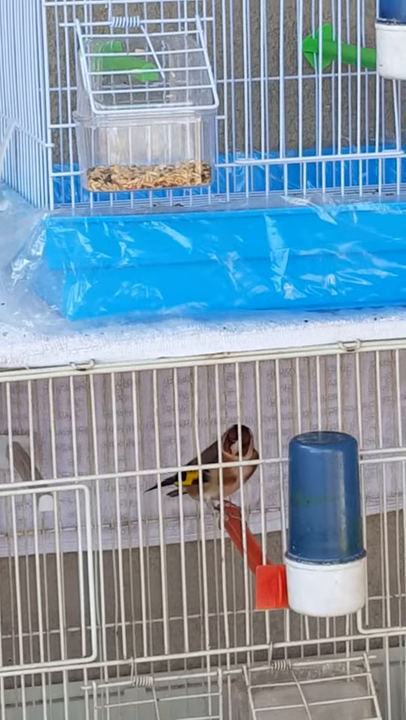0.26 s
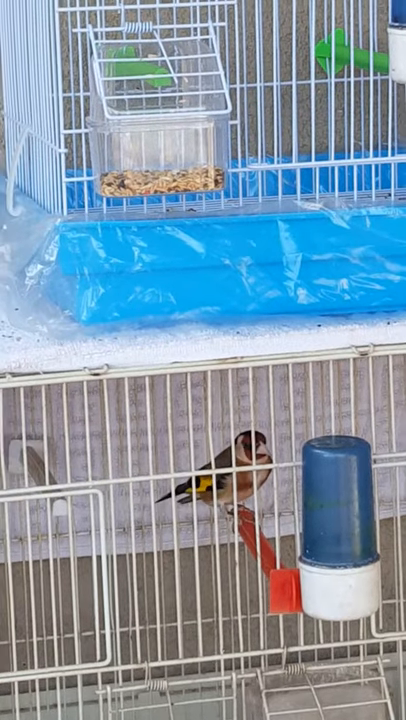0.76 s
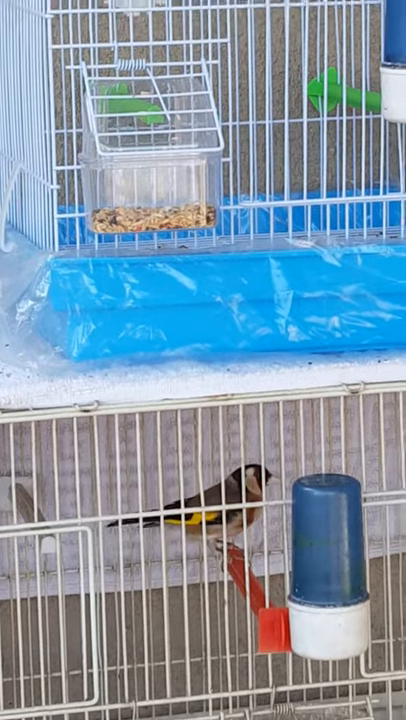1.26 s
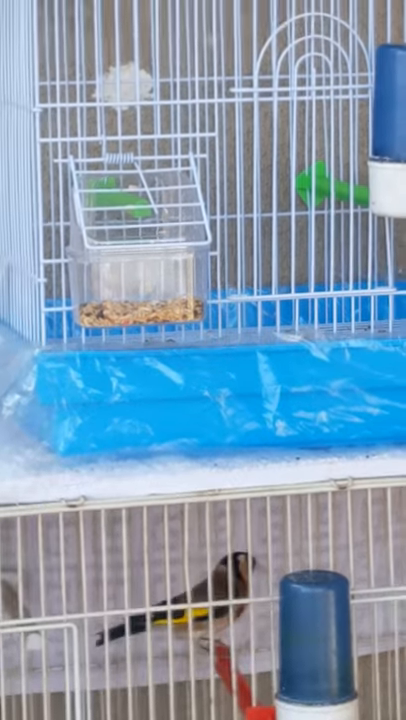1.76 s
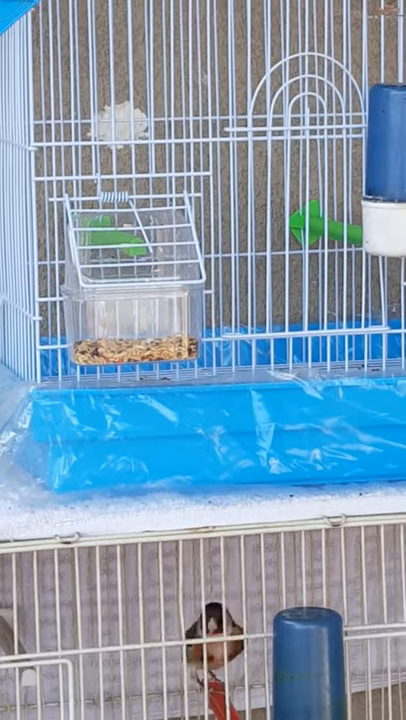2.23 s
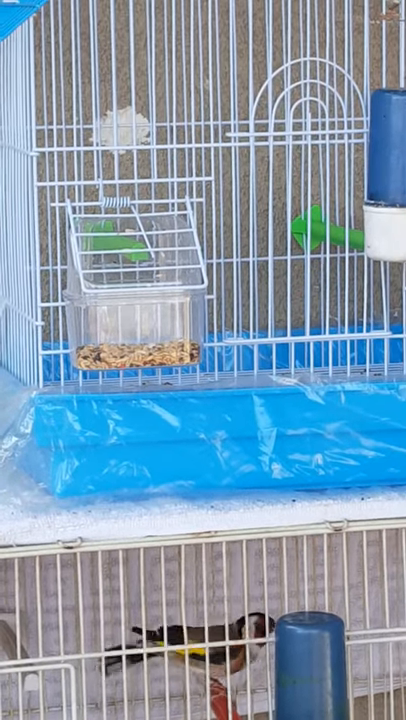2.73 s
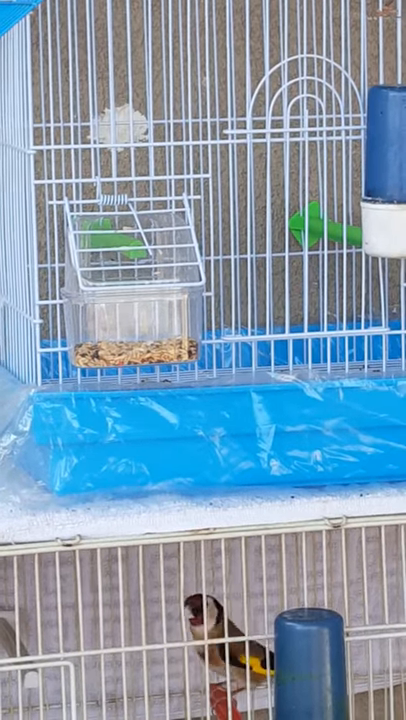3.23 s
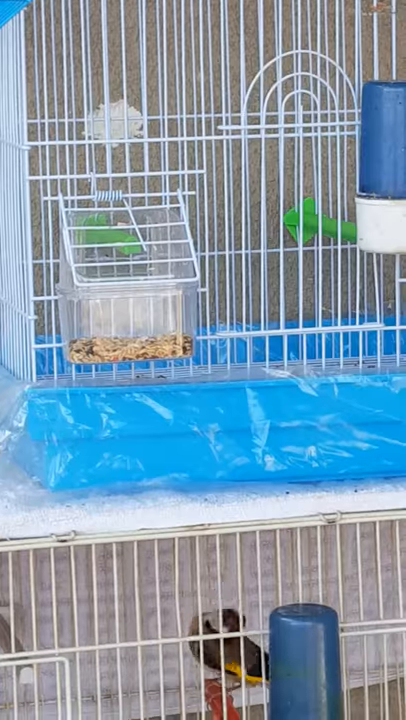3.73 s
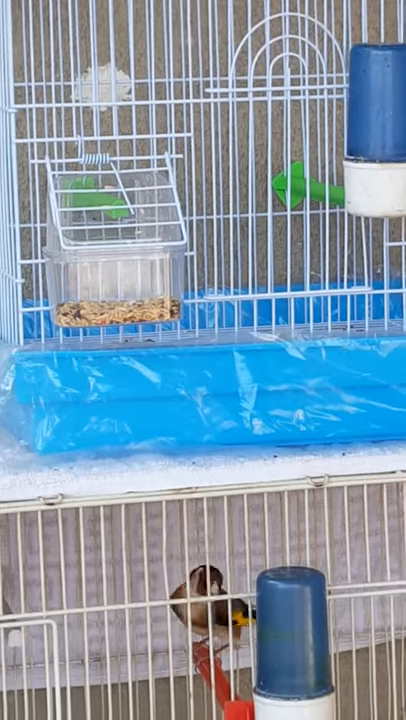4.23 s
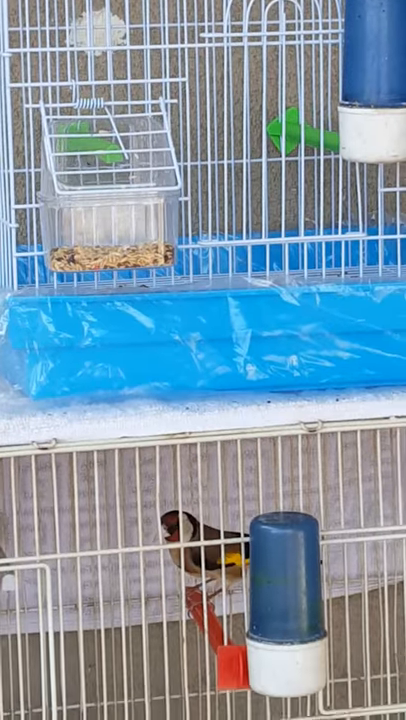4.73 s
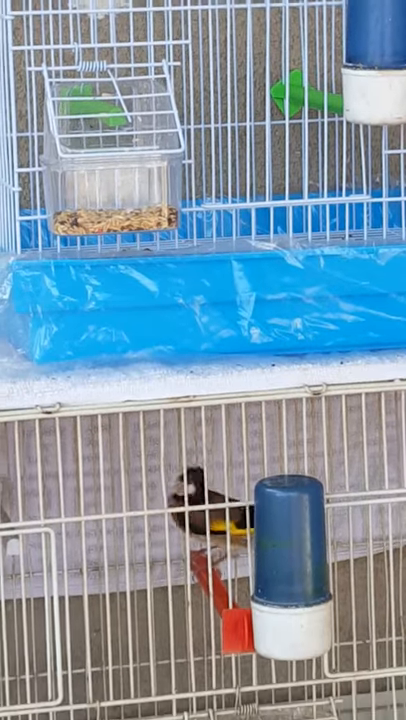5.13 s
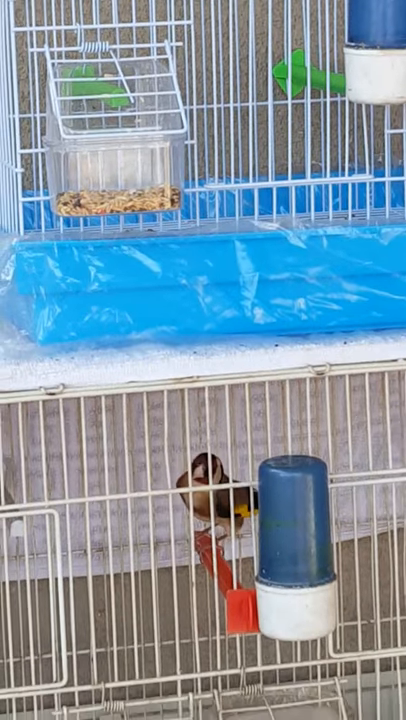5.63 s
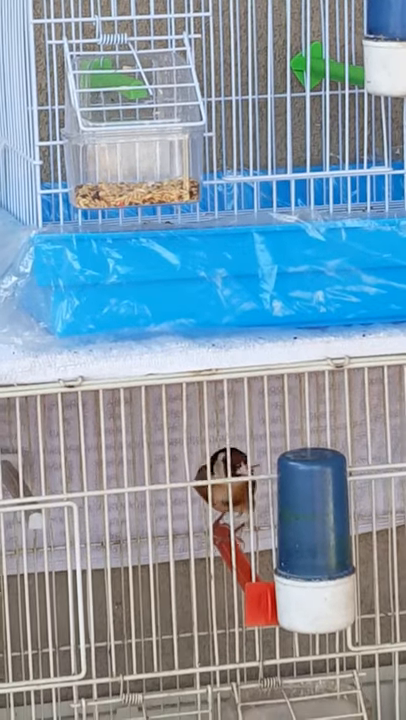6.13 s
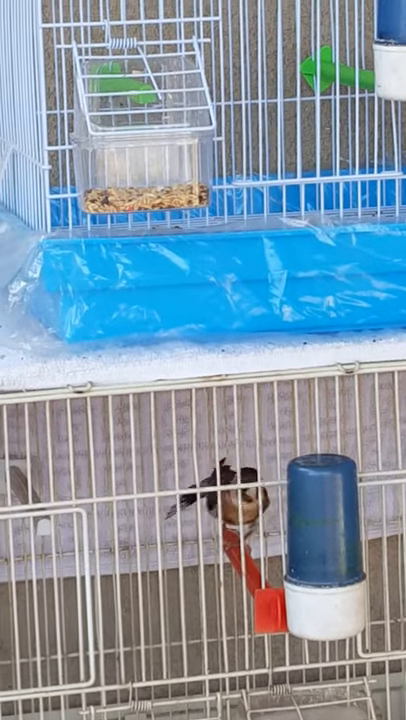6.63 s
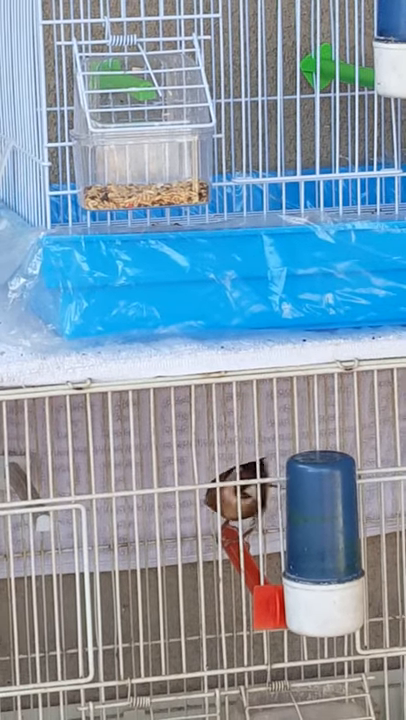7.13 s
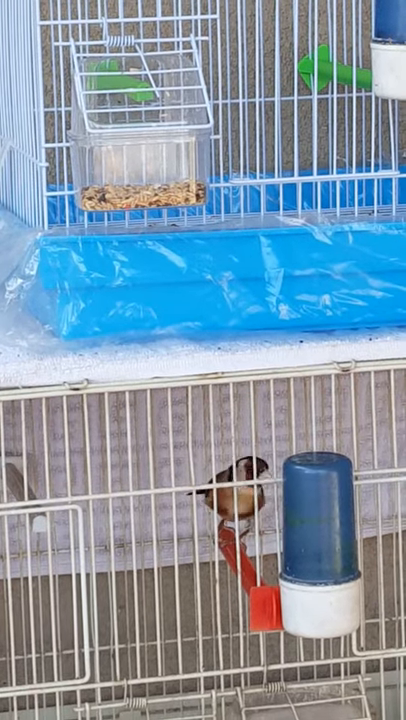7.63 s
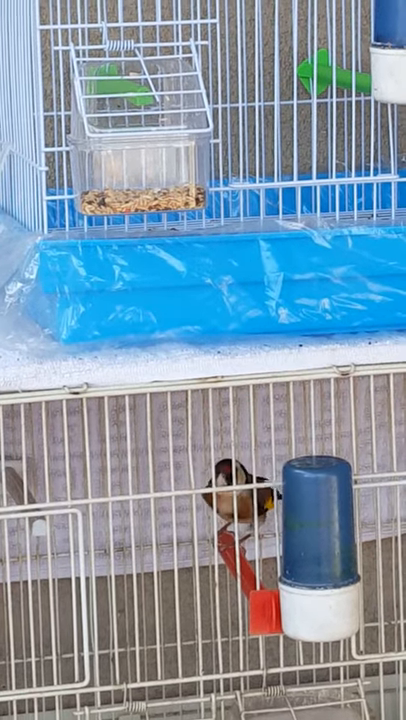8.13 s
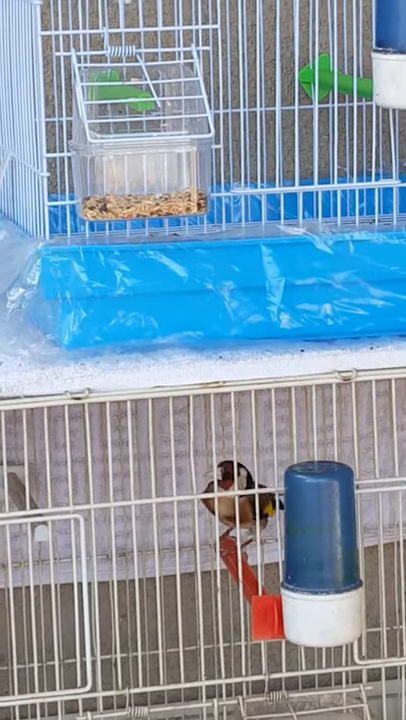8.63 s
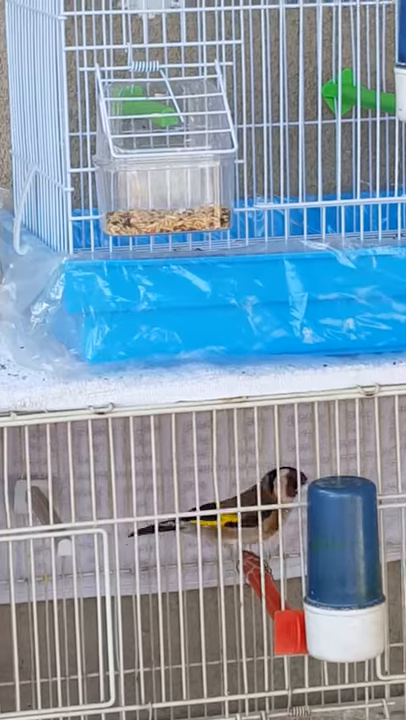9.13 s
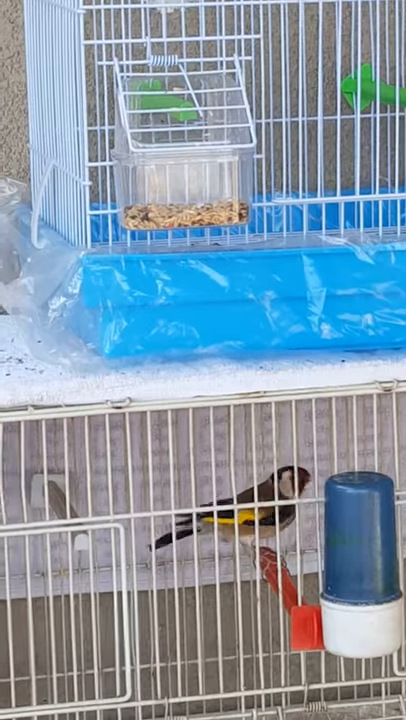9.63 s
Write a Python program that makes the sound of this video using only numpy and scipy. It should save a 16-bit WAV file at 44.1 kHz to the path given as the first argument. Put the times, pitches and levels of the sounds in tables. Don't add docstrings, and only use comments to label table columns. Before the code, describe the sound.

Bright goldfinch calls ring from hard balcony walls, short falling trills and a piercing long whistle, with light cage ticks, distant birds and dull traffic.

```python
import sys
import numpy as np
from scipy import signal
from scipy.io import wavfile
from scipy.ndimage import uniform_filter1d

SR = 44100
rng = np.random.default_rng(int(sys.argv[2]) if len(sys.argv) > 2 else 0)


def to_wav(sig):
    pcm = np.clip(np.atleast_2d(sig), -1, 1) * 32767
    pcm = np.round(pcm).astype(np.int16)
    wavfile.write(sys.argv[1], SR, pcm.T)


def elevation(decibels):
    levels = np.asarray(decibels, float)
    return 10 ** (levels / 20)


N = 435266

# [t/s, level/dB]
TRAFFIC = [(0, -0.5), (2, -2.5), (4, 0.5), (6.5, -0.3), (7.5, 2.5), (8.5, -4.5), (9.87, -1)]
# [f/Hz, level per Hz/dB]
HUM_SPECTRUM = [(25, -7.5), (50, -1.5), (79, -10.5), (105, -3.5), (310, -7.5), (450, -12.5), (1000, -11),
                (1600, -15.5), (2500, -21), (5400, -30.5), (6300, -38), (9500, -48.5), (13000, -45.5),
                (16000, -42)]
# [f/Hz, correlation/1]
HUM_LIKENESS = [(30, 0.95), (130, 0.98), (290, 0.91), (640, 0.67), (1410, 0.21), (3100, 0.1), (6820, 0.074)]
# [f/Hz, left over right/dB]
HUM_LEAN = [(60, 0.5), (110, 0.5), (200, 0), (380, 0.0), (700, 0.0), (1290, -3), (2380, -0.5), (4400, -3),
            (8120, 4), (15000, -2)]
# [f/Hz, width/Hz, early level/dB, late level/dB, flutter/dB]
MURMUR = [
    (50.1, 16, -69, -61, 1),
    (109.2, 11, -66.5, -68, 2),
    (4400, 270, -74, -84, 2.5),
    (5600, 190, -80, -87.5, 3),
]
# [t/s, length/s, first f/Hz, last f/Hz, level/dB]
FAR_LEFT = [(.34, .11, 5050, 4950, -74), (.36, .25, 4150, 4250, -70), (.725, 0.091, 2300, 2200, -59.5),
            (0.817, .06, 2400, 2300, -60), (.86, .05, 4550, 4550, -69), (1.473, 0.032, 5000, 4950, -67),
            (1.475, 0.042, 3600, 3600, -66), (1.472, .03, 2380, 2400, -59), (2.452, 0.19, 4300, 4300, -68),
            (6.455, .05, 5950, 5200, -70), (7.46, .07, 3700, 3700, -64), (7.453, .067, 4700, 4590, -62),
            (7.53, .09, 4450, 4320, -57)]
FAR_RIGHT = [(1.69, 0.034, 6100, 6050, -69), (3.82, .53, 6900, 6600, -79), (3.894, .06, 4700, 4480, -66),
             (4.19, .06, 5500, 5450, -61.5), (4.40, .12, 6400, 6350, -83), (5.01, 0.02, 5670, 5600, -62),
             (5.33, .14, 3050, 3000, -64.5), (6.54, .03, 4400, 4600, -69), (6.55, .09, 3030, 3050, -64.5),
             (6.563, 0.053, 7000, 6900, -73), (7.585, .04, 4000, 3780, -55.5), (7.45, .07, 7220, 7200, -72),
             (7.718, .035, 7200, 7200, -64), (7.953, 0.033, 6050, 6270, -56.5),
             (7.96, 0.031, 2230, 3100, -59), (7.982, .055, 4230, 3600, -42.5),
             (8.89, 0.036, 6000, 5300, -71), (9.17, 0.045, 4400, 3800, -62)]
# [t/s, peak level/dB]
TICKS = [(0.779, -62), (0.809, -62), (0.999, -69), (1.269, -64), (1.475, -55), (1.489, -65.5), (1.687, -57),
         (1.769, -63), (1.939, -68.5), (2.340, -55.5), (2.597, -62), (3.218, -51), (3.939, -62),
         (4.233, -60), (6.230, -62), (7.454, -66.5), (8.406, -62), (9.095, -60), (9.129, -53.5),
         (9.149, -60), (9.199, -62)]

# [churr t/s, grace t/s, chirrup t/s, catch t/s, whistle t/s]
PHRASES = [
    (2.679, 2.788, 2.823, 2.910, 2.980),
    (6.641, 6.756, 6.794, 6.878, 6.948),
]
# [first f/Hz, turning f/Hz, last f/Hz, turn t/s, bend as a power of time/1]
LOW_PITCH = [
    (1342, 1960, 1965, .104, 1.3),
    (2440, 2750, 2620, .025, 1.5),
    (2520, 2700, 2960, .030, 1.2),
    (1970, 2860, 2900, .017, 1.267),
    (2744, 5240, 5600, .016, .8),
    (5500, 3515, 3560, .17, 3.0),
]
HIGH_PITCH = [
    (1920, 2335, 2340, .104, 1.1),
    (3553, 3100, 3000, .025, 1.34),
    (3000, 3520, 4200, .025, 1.5),
    (2845, 3270, 3800, .017, 1.82),
    (5400, 6300, 6180, .016, 2.4),
    (6320, 5800, 5610, 0.064, 1.5),
]
# [wait/s, attack/s, hold/s, release/s, held level/dB, growth over the hold/dB]
LOW_BREATH = [
    (0.0021, .030, .060, .015, -50, -6),
    (0.0088, .008, .010, .008, -50.5, 3.5),
    (.012, .014, .032, 0.0089, -38.5, 3.5),
    (0.00096, .004, 0.015, .004, -44.5, 2),
    (0.0007, 0.0051, 0.014, 0.023, -36.5, 5),
]
HIGH_BREATH = [
    (.008, 0.033, 0.054, .015, -51, 5),
    (.0, .005, .007, .014, -49, 2.5),
    (.0, .009, .018, .007, -41, 9.5),
    (0.0025, 0.0033, .011, .004, -39.5, -8),
    (.011, .010, .020, .012, -21.5, -8.5),
]
# [hold/s, release/s, low side growth/dB, high side growth/dB]
WHISTLES = [
    (0.264, .06, -6.5, -19.5),
    (.21, 0.05, -3, -4.5),
]
# [fall per overtone at start/dB, at end/dB, coupling of the sides/dB,
# breath noise/dB, pitch jitter/1, octave of the low side/dB]
VOICING = [
    (-.5, -5.5, -2, -5, .014, 2.5),
    (-12, -2, -12.5, -20, 0.0063, 1),
    (-4, -26.5, -4, -3, .01, 1.5),
    (-2, -11, -7.5, 2.5, .035, -4.5),
    (-7, -20.5, -11, 4.5, .03, -6.5),
    (-11, -14.5, -2.5, -24.5, 0.0023, -8.5),
]
# [f/Hz, level/dB]
THROAT = [(1000, -23), (2200, -8), (3500, 6.5), (4600, 8), (6000, 2.5), (8500, -6.5), (10500, -21.5),
          (13000, -7.5), (16000, -14.5)]

# [t/s, strength/dB, pitch ratio/1, overtone gain from facing the listener/dB]
TRILLS = [
    (4.578, -14.5, 0.98, -1),
    (5.657, -16.5, 0.98, 4.5),
    (7.744, -16, 0.97, 0.5),
    (9.374, -16, 0.97, -1.5),
]
# [t/s, strength/dB]
DROPS = [
    [(4.665, -11), (4.711, -11.5), (4.758, -12), (4.811, -13.5), (4.864, -16)],
    [(5.740, -13), (5.787, -13.5), (5.835, -16), (5.887, -19)],
    [(7.828, -13), (7.876, -14)],
    [(9.459, -12), (9.509, -12), (9.558, -14.5)],
]
# [first f/Hz, turning f/Hz, last f/Hz, turn t/s, bend as a power of time/1]
TRILL_PITCH = [
    (2430, 3480, 2230, .020, 2.5),
    (3130, 4230, 2900, .014, 2.5),
    (4830, 4820, 2100, 0.00097, 2.0),
]
# [attack/s, hold/s, release/s, growth over the hold/dB, first rasp/dB, last rasp/dB]
TRILL_BREATH = [
    (.005, .021, 0.0082, 7.5, -42, -10.5),
    (.005, .017, .007, 5.5, -23.5, -44),
    (.0015, .0135, .011, 3, -27, -29),
]
# [level/dB of multiples 2, 3, 4, 5]
TRILL_OVERTONES = [
    (-23.5, -34, -42.5, -42.5),
    (-32, -40.5, -42, -60),
    (-37, -40.5, -56, -59.5),
]

# [delay/s, left level/dB, right level/dB]
PHRASE_WALLS = [(0.0, -0.5, 1.5), (.005, -8, -14), (.012, -17.5, -14), (.024, -13, -26)]
TRILL_WALLS = [(0.0, 2, -7.5), (.0035, -7, -1.5), (.008, -17.5, -1.5), (0.0104, -15, -3.5), (.022, -9, -19),
               (.031, -23, -17)]
# [low f/Hz, high f/Hz, left level/dB, right level/dB]
PHRASE_SHADE = [(5000, 6950, -6.5, 2.5), (8170, 10300, 4, -8), (13000, 14000, 6.5, 2)]
TRILL_SHADE = [(5000, 10000, -1, 1.5), (7500, 10600, 4, -15), (12140, 16000, 4, 1.5)]


def at_hz(points, hz):
    f, level = np.transpose(points)
    return np.interp(np.log(hz), np.log(f), level)


def rms_one(x):
    return x / np.sqrt(np.mean(x ** 2) + 1e-20)


def drift(rate_hz, size):
    knot_rate = 400
    knots = rng.standard_normal(int(size / SR * knot_rate) + 50)
    pole = np.exp(-2 * np.pi * rate_hz / knot_rate)
    slow = rms_one(signal.lfilter([1], [1, -2 * pole, pole * pole], knots))
    return np.interp(np.arange(size) * knot_rate / SR, np.arange(len(slow)), slow)


def bandpass(order, low_hz, high_hz, x):
    return signal.sosfilt(signal.butter(order, [low_hz, high_hz], "band", fs=SR, output="sos"), x)


def ear_gains(lean_db):
    return elevation(lean_db * np.array([[0.5], [-0.5]]))


def add(track, s, sound):
    i = round(s * SR)
    track[..., i:i + sound.shape[-1]] += sound[..., :N - i]


def running_phase(hz):
    return 2 * np.pi * np.cumsum(hz) / SR


def clock(seconds):
    return np.arange(round(seconds * SR)) / SR


def glide(t, first_hz, turn_hz, last_hz, turn_s, bend):
    before = np.clip(1 - t / turn_s, 0, 1)
    after = np.clip((t - turn_s) / np.maximum(t[-1] - turn_s, 1e-4), 0, 1)
    return turn_hz + (first_hz - turn_hz) * before ** bend + (last_hz - turn_hz) * after ** bend


def breath_level(t, wait, attack, hold, release, level_db, growth_db):
    before_db, after_db = -29.5, -31
    corners = np.cumsum(np.abs([wait, attack, hold, release]))
    shape_db = np.interp(t, corners, [before_db, 0, growth_db, growth_db + after_db])
    return uniform_filter1d(level_db + shape_db, size=88)


def town():
    level_db, patchy_db = -49.5, 0.98
    rumble_follows, hiss_follows = 1, 0.6
    traffic_db = np.interp(np.arange(N) / SR, *np.transpose(TRAFFIC))
    out, edges = 0, 20 * 2 ** np.arange(0, 9.8, 1 / 3)
    white = rng.standard_normal((2, 2, N + SR))
    for k, (low, high) in enumerate(zip(edges, edges[1:])):
        mid, side = bandpass(2, low, high, white[k % 2])[:, SR:]
        hz = np.sqrt(low * high)
        alike = np.clip(at_hz(HUM_LIKENESS, hz), -1, 1)
        rumble = rumble_follows * at_hz([(60, 1), (300, 0)], hz)
        hiss = hiss_follows * at_hz([(1000, 0), (3500, 1)], hz)
        gain = elevation(at_hz(HUM_SPECTRUM, hz) + (rumble + hiss) * traffic_db + patchy_db * drift(1.3, N))
        stereo = np.sqrt(1 + alike) * mid + np.sqrt(1 - alike) * side * [[1], [-1]]
        out = out + gain * ear_gains(at_hz(HUM_LEAN, hz)) * stereo
    return elevation(level_db) * rms_one(out)


def murmur():
    out = 0
    for hz, width_hz, early_db, late_db, flutter_db in MURMUR:
        white = rng.standard_normal((2, N + SR))
        if hz < 1000:
            white[1] = white[0]
        band = bandpass(2, hz - width_hz / 2, hz + width_hz / 2, white)[:, SR:]
        level_db = np.linspace(early_db, late_db, N) + flutter_db * drift(3, N)
        out = out + elevation(level_db) * rms_one(band)
    return out


def far_birds():
    out = np.zeros((2, N))
    for calls, lean_db in [(FAR_LEFT, 6.5), (FAR_RIGHT, -4)]:
        for s, length, first_hz, last_hz, level_db in calls:
            size = round(length * SR)
            phase = running_phase(np.linspace(first_hz, last_hz, size) * (1 + 0.018 * drift(70, size)))
            tone = (np.sin(phase) + elevation(-20) * np.sin(2 * phase)) * np.sqrt(np.hanning(size))
            flicker_db = 4.6 * np.array([drift(45, size), drift(45, size)])
            add(out, s, tone * elevation(level_db + flicker_db) * ear_gains(lean_db))
    scatter = rng.standard_normal((2, 5000)) * elevation(-26 - 60 * np.arange(5000) / SR / 0.11)
    scatter[:, 0] = 0.97
    return signal.fftconvolve(out, scatter, axes=1)[:, :N]


def ticks():
    wire_hz, wire_spread, perch_lean_db = 7200, 0.06, 0.5
    out, t = np.zeros((2, N)), np.arange(2600) / SR
    bright = signal.butter(2, 2500, "high", fs=SR, output="sos")
    for s, peak_db in TICKS:
        wire, place = rng.uniform(-1, 1, 2)
        hz = wire_hz * (1 + wire_spread * wire)
        scratch = rng.standard_normal((2, len(t))) * elevation(-60 * t / 0.11)
        wires = bandpass(1, hz * 0.87, hz * 1.09, scratch)
        touch = elevation(-15) * signal.sosfilt(bright, scratch) + elevation(5) * wires
        add(out, s, touch * elevation(peak_db) * ear_gains(perch_lean_db * (1 + place)))
    return out


def syrinx(low_hz, low_db, high_hz, high_db, first_db, last_db, couple_db, breath_db, jitter, octave_db):
    size = len(low_hz)
    low_db = low_db + 1.2 * drift(25, size)
    high_db = high_db + 1.2 * drift(25, size)
    fall_db = np.linspace(first_db, last_db, size)
    wobble = 1 + jitter * drift(60.44, size)
    low = running_phase(low_hz * wobble)
    high = running_phase(high_hz * wobble ** 0.15)
    out = elevation(low_db) * np.sin(low) + elevation(high_db) * np.sin(high)
    for m in range(-2, 7):
        for n in range(0, 5):
            order, hz = abs(m) + n, m * low_hz + n * high_hz
            if order < 2 or hz.max() < 900:
                continue
            tone_db = (abs(m) * low_db + n * high_db) / order
            tone_db = tone_db + couple_db * ((m != 0) * (n != 0) + (m < 0))
            tone_db += fall_db * (order - 1) + at_hz(THROAT, np.maximum(hz, 100))
            if m == 0:
                tone_db -= 7
            if m == 2 and n == 0:
                tone_db += octave_db
            if order > 2:
                tone_db += 2.5 * drift(30, size) + 4 * rng.standard_normal()
            audible = (hz < 17000) * (hz > 900)
            out += elevation(tone_db) * np.sin(m * low + n * high + order * m) * audible
    breath = bandpass(2, 4200, 7500, rng.standard_normal(size))
    return np.sqrt(2) * out + elevation(low_db + breath_db + 0.55 * fall_db) * breath


def phrases():
    out = np.zeros(N)
    for (*first, catch, last), (hold, release, low_growth_db, high_growth_db) in zip(PHRASES, WHISTLES):
        lows = list(LOW_BREATH) + [(0, 0.038, hold, release, -41, low_growth_db)]
        highs = list(HIGH_BREATH) + [(0.0007, 0.048, hold, release, -29.5, high_growth_db)]
        starts = [*first, catch, catch + 0.014, last]
        notes = zip(starts, lows, highs, LOW_PITCH, HIGH_PITCH, VOICING)
        for s, low, high, low_pitch, high_pitch, voicing in notes:
            t = clock(max(sum(low[:-2]), sum(high[:-2])))
            low_side = glide(t, *low_pitch), breath_level(t, *low)
            high_side = glide(t, *high_pitch), breath_level(t, *high)
            add(out, s, syrinx(*low_side, *high_side, *voicing))
    return out


def trill_note(kind, ratio, facing_db):
    attack, hold, release, growth_db, *rasps_db = TRILL_BREATH[kind]
    t = clock(attack + hold + release)
    hz = ratio * glide(t, *TRILL_PITCH[kind])
    level_db = breath_level(t, 0, attack, hold, release, -growth_db, growth_db)
    phase = running_phase(hz)
    tone = np.sin(phase)
    gape_db = 1.7 * rng.standard_normal(4)
    for k, over_db in enumerate(TRILL_OVERTONES[kind]):
        over_level = elevation(over_db + facing_db + 0.82 * level_db + gape_db[k])
        tone += over_level * np.sin((k + 2) * phase) * (hz * (k + 2) < 17000)
    air = rng.standard_normal(len(hz))
    rasp_db = np.interp(t, [0.6 * (attack + hold), attack + hold], rasps_db) + 4 * rng.standard_normal()
    rasp = bandpass(1, 4300, 7000, air) + elevation(-20) * np.diff(air, 2, prepend=[0, 0])
    return elevation(level_db) * (tone + elevation(rasp_db) * rasp)


def trills():
    out = np.zeros(N)
    for (start, strength_db, ratio, facing_db), drops in zip(TRILLS, DROPS):
        arches = [(start, strength_db), (start + 0.033, strength_db + 2)]
        for n, (s, peak_db) in enumerate(arches + list(drops)):
            add(out, s, elevation(peak_db) * trill_note(min(n, 2), ratio, facing_db))
    return out


def balcony(dry, walls, shade, lag, early_db, late_db):
    t = np.arange(SR) / SR
    noise = rng.standard_normal((2, 2, SR))
    early = elevation(early_db - 60 * t / 0.17) * noise[0] * np.minimum(t / 0.0039, 1)
    late = elevation(late_db - 60 * t / 0.71) * noise[1] * np.minimum(t / 0.015, 1)
    reply = early + signal.sosfilt(signal.butter(2, 5500, fs=SR, output="sos"), late)
    for delay, left_db, right_db in walls:
        i = round(delay * SR) + 10
        reply[0, i] += elevation(left_db)
        reply[1, i + round(lag)] += elevation(right_db)
    for low_hz, high_hz, *ears_db in shade:
        reply = reply + (elevation(ears_db)[:, None] - 1) * bandpass(1, low_hz, high_hz, reply)
    return signal.fftconvolve(dry[None], reply, axes=1)[:, 10:N + 10]


def scene():
    background = town() + murmur() + far_birds() + ticks()
    phrase_bird = balcony(phrases(), PHRASE_WALLS, PHRASE_SHADE, lag=-1, early_db=-29.5, late_db=-45.5)
    trill_bird = balcony(trills(), TRILL_WALLS, TRILL_SHADE, lag=5, early_db=-30.5, late_db=-43)
    return background + phrase_bird + trill_bird


def band_limit(x):
    return signal.sosfilt(signal.butter(12, 16360, fs=SR, output="sos"), x)


def record(dry):
    top_cut = signal.cheby2(14, 50, 16250, fs=SR, output="sos")
    mix = signal.sosfilt(top_cut, dry)
    return band_limit(mix)


dry = scene()
out = record(dry)
to_wav(out)
```